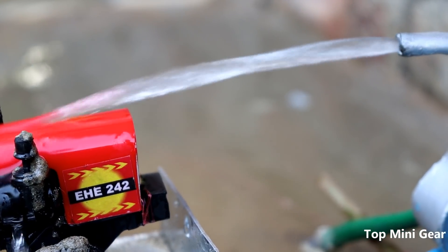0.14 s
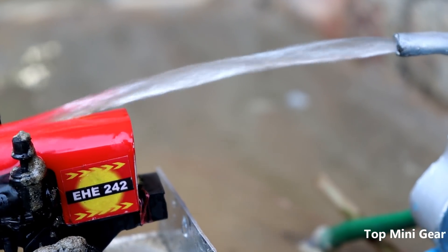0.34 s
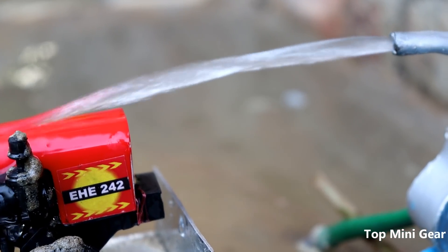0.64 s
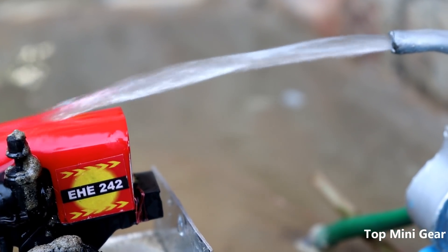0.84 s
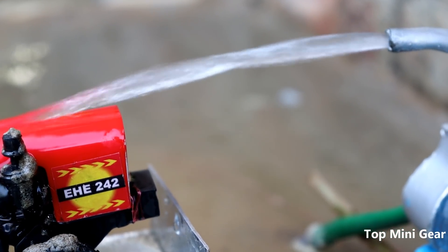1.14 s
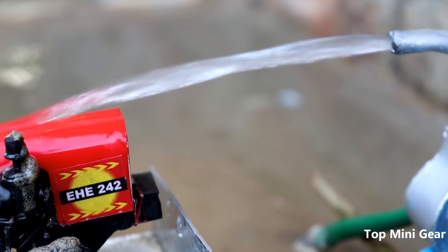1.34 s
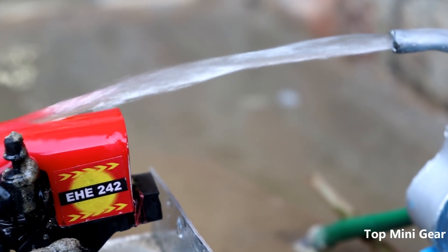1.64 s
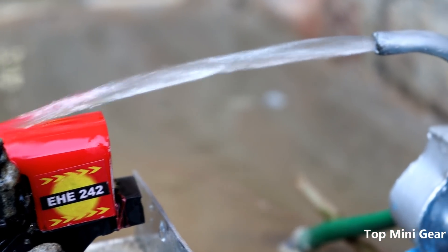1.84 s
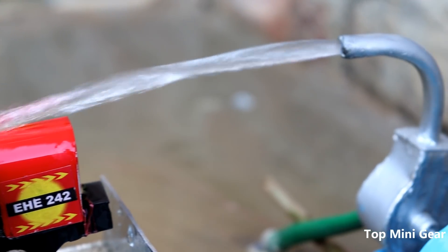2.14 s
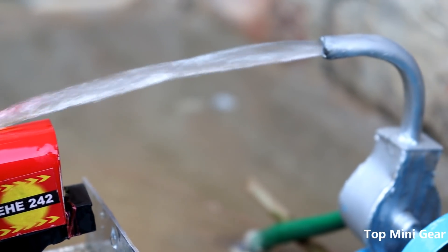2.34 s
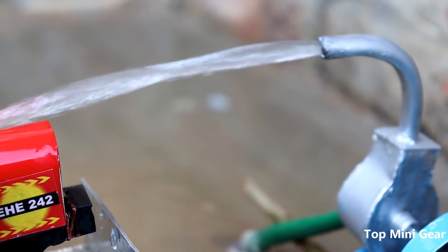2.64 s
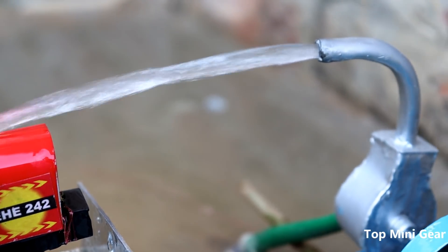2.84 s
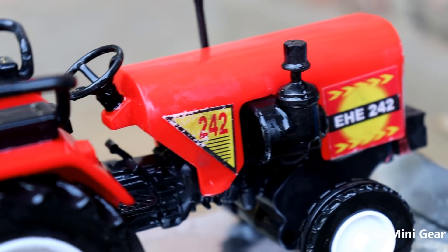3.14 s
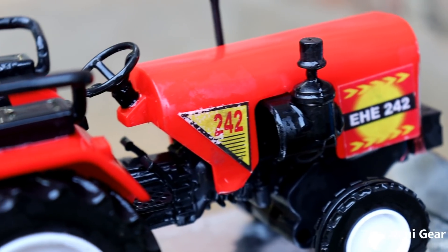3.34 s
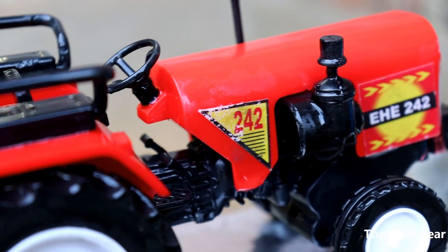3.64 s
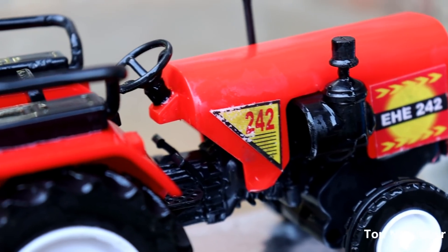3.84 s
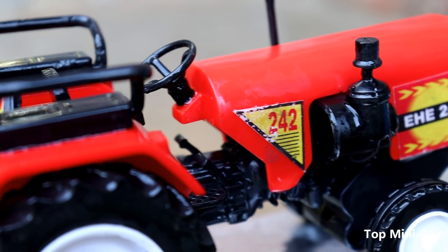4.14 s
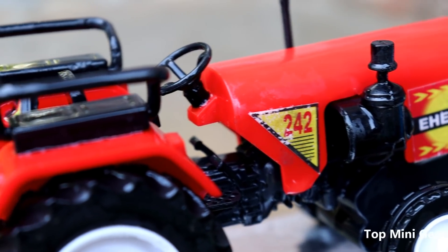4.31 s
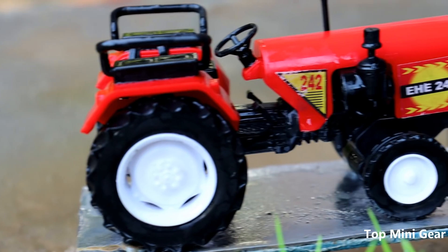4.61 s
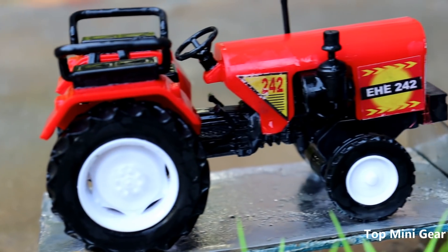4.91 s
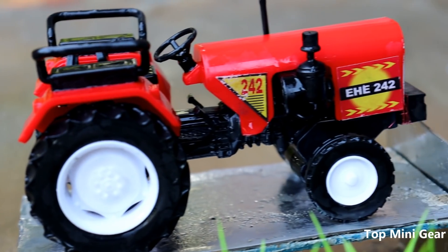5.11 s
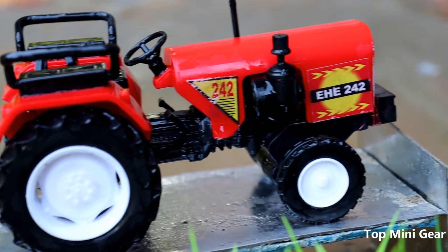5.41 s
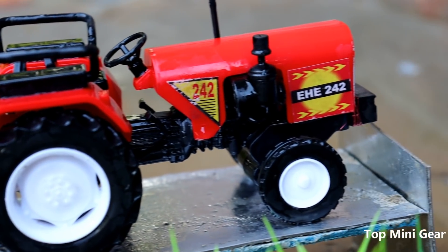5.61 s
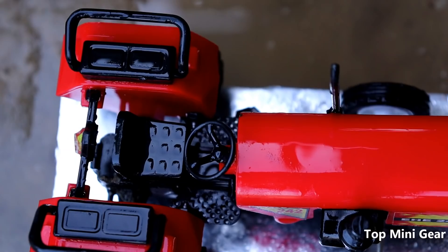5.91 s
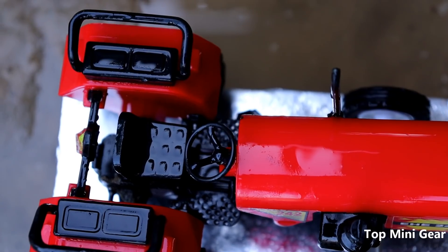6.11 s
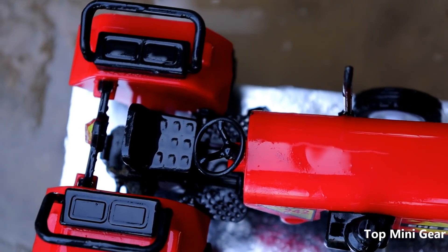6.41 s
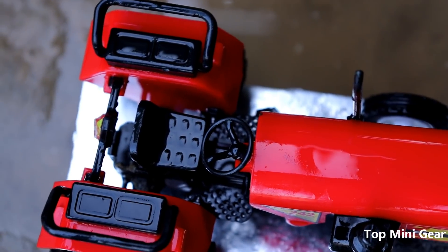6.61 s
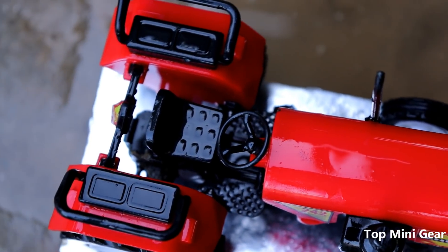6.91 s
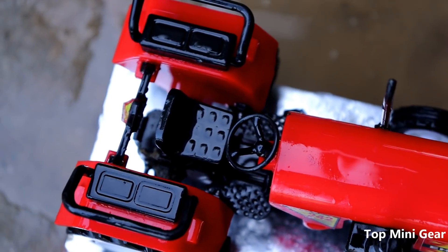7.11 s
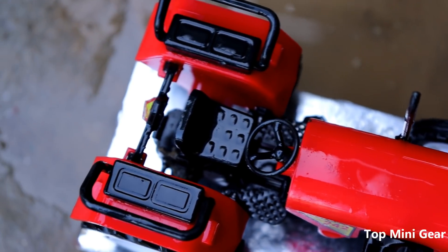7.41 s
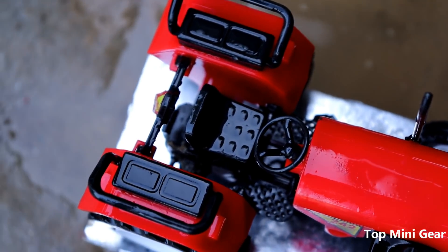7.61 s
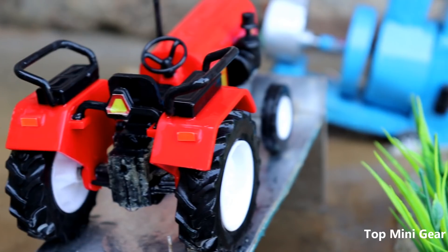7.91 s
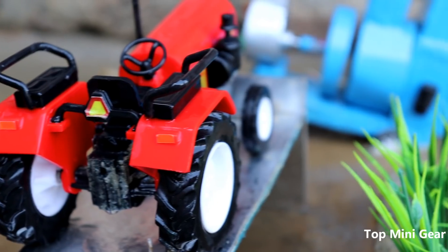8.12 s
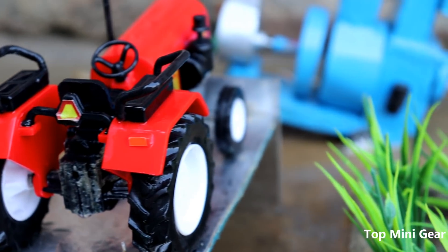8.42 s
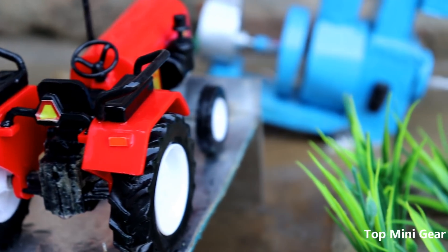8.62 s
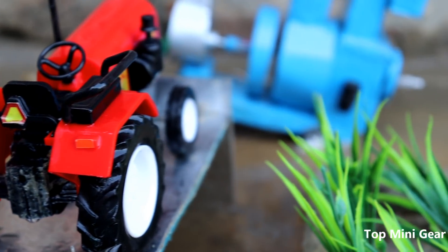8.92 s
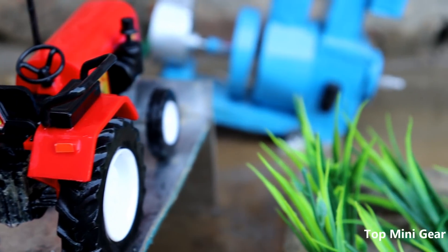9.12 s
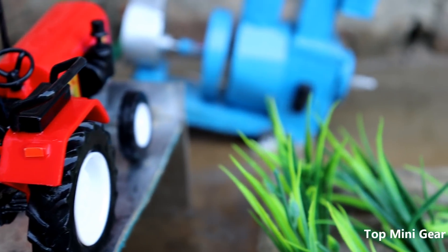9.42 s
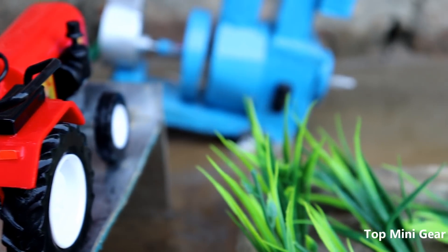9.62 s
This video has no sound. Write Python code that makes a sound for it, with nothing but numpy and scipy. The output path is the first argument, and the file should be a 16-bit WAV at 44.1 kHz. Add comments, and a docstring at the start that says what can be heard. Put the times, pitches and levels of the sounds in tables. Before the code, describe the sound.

Outdoors, loud, rapid chugging and rattling from a small nearby pump mixes with the pulsing hiss and wide spatter of water hitting plastic. A few sharp clacks come just before it all cuts off, three seconds in. Soft chirps, gliding whistles and distant raspy fowl crows fill the rest over a gentle hush of trees, broken once, midway, by a split-second burst of the chug.

```python
"""Chug and water jet among birds

An engine-like chug knocks and rattles about 12 times a second. With each stroke a thin jet spurts and
spatters on a plastic toy. Both stop dead at 3 s; a brief, abruptly cut burst of chug noise comes at 5 s.
Small birds whistle in the trees (gliding sines) and hoarse fowl crow far off (harmonics and rasp
through a throat resonance), over a low rumble and the hush of the trees."""
import sys
import numpy as np
from scipy import signal
from scipy.fft import rfft, irfft, next_fast_len
from scipy.io import wavfile

SR = 44100
rng = np.random.default_rng(int(sys.argv[2]) if len(sys.argv) > 2 else 0)


def unload_audio(sound):
    """Save the sound as a 16-bit wav file, at the path given as the first command line argument."""
    columns = np.transpose(np.atleast_2d(sound))
    # keep every value between -1 and 1, then stretch to whole-number steps
    steps = np.round(np.clip(columns, -1, 1) * 32767)
    wavfile.write(sys.argv[1], SR, steps.astype(np.int16))


N = 429975
TIME = np.arange(N) / SR
STROKE_S, FIRST_STROKE_S, CHUG_OFF_S = .08511, .021, 3.003

# housing modes: t in stroke/s, rise/s, decay/s, f/Hz, level/dB
HOUSING_KNOCKS = [(-.0006, .0034, .002, 352, -5.6), (-.0009, .0025, .0022, 540, -20),
                  (-.0005, .005, .0047, 217, -23), (.0208, .0032, .009, 225, -18.4),
                  (.0209, .002, .0065, 364, -13.3), (.0405, .0018, .004, 725, -17.5),
                  (.0537, .002, .004, 930, -21), (.0578, .0008, .0057, 367, -13.3),
                  (.058, .004, .0135, 96, -25.5)]
# drive rattle: t in stroke/s, rise/s, decay/s, f/Hz, bandwidth/Hz, level/dB
DRIVE_RATTLES = [(0.039, 0.0022, 0.011, 740, 347.5, -24.5), (0.0404, .0025, 0.011, 2530, 600, -19.5),
                 (.042, .003, 0.016, 1600, 994.5, -26), (0.053, .004, 0.017, 890, 401, -28.5),
                 (0.0573, 0.0006, 0.0016, 3613, 3587, -15), (0.059, .002, 0.05, 1510, 903, -24),
                 (.059, .0015, 0.016, 2770, 520, -17), (0.062, .003, 0.015, 4730, 1866, -21),
                 (0.08, .002, 0.0088, 2600, 707, -23.5)]
# rattle gain: t/s, level/dB
RATTLE_GAIN = [(0, 1.5), (1.2, .5), (2, -1.5), (3, -4.5)]
# nozzle spurt: t/s, t in stroke/s, level/dB
SPURT_TRACK = [(0, 0.069, -17), (.7, 0.069, -16.5), (1.45, 0.064, -14), (1.75, 0.063, -12.5),
               (2.4, .063, -12), (2.8, 0.063, -11.5), (3, 0.058, -12)]
# chug and water spectra: f/Hz, level/dB
WHIR_SPECTRUM = [(10, -30.5), (60, -11.5), (150, -3.5), (330, 2.5), (560, 0), (950, -1.5), (1200, -10),
                 (1900, -8), (2600, -4), (3300, -7), (6000, -14.5), (10000, -18.5), (15000, -12.5)]
SPURT_SPECTRUM = [(2000, -27.5), (5000, -4), (7000, -11), (10000, -4.5), (14500, 1), (16000, -5.5)]
SPATTER_SPECTRUM = [(1470, -8.5), (2500, -31.5), (2620, -11.5), (3260, -17.5), (4510, -0.5), (8020, -4.5),
                    (12900, -4), (15000, -10), (16000, -15.5)]
CLACK_SPECTRUM = [(500, -12), (1200, -4), (2700, 2.5), (5000, -1.5), (9000, -12), (16000, -16)]
BURST_SPECTRUM = [(59, -48), (100, -15), (373, 3.5), (524, -16), (970, -3.5), (1360, -11), (1520, -12),
                  (4770, -15), (6990, -28.5), (12400, -20), (16000, -16)]
# background envelopes: t/s, level/dB
BREEZE_ENVELOPE = [(0, -49), (1.8, -50), (2.3, -43), (3, -43)]
RUMBLE_ENVELOPE = [(4.1, -66), (4.6, -56.5), (6, -58.5), (6.3, -65.5), (8.3, -65), (8.9, -59.5), (9.6, -71)]
# background spectra: f/Hz, level/dB
BREEZE_SPECTRUM = [(10, -3), (18, 0), (40, -14), (100, -18), (500, -28), (3000, -50)]
RUMBLE_SPECTRUM = [(20, -8), (50, -3), (95, 1.5), (130, -9), (200, -16.5), (400, -51.5)]
TREE_HUSH_SPECTRUM = [(100, -25.5), (200, -17.5), (280, -11), (400, -22.5), (530, -21), (680, -4.5),
                      (1000, -3.5), (1350, -1), (1750, -7), (2100, -13), (4300, -27), (6500, -24.5),
                      (8000, -29.5), (16000, -32)]
LOW_FLOCK_SPECTRUM = [(1800, -33), (2250, -2.5), (2550, -1), (2800, -6), (3100, -26.5), (4000, -46.5)]
HIGH_FLOCK_SPECTRUM = [(2500, -18.5), (2950, -4), (3450, 3), (3800, -11.5), (4200, -25), (5500, -44)]
# flare-ups of two far flocks: peak t/s, half length/s, level/dB
LOW_FLOCK_FLARES = [(3.97, .16, -52.5), (4.748, .12, -51), (5.15, 0.24, -53), (5.976, .12, -50),
                    (6.502, 0.2, -52), (7, 0.33, -50.5), (8.095, 0.19, -51), (8.8, 0.21, -50),
                    (9.558, 0.15, -49.5)]
HIGH_FLOCK_FLARES = [(3, .12, -53), (3.7, .18, -53), (4.74, 0.15, -50), (5.5, 0.25, -58), (6.87, 0.13, -50),
                     (7.43, 0.16, -53), (8.37, 0.25, -52), (9.1, 0.11, -55), (9.63, 0.13, -54)]
# clacks accenting late strokes: t/s, level/dB
ACCENT_CLACKS = [(2.273, -19.5), (2.357, -13), (2.7, -17), (2.943, -10), (2.977, -13.5)]
# falling bird notes: t/s, length/s, top f/Hz, held f/Hz, level/dB
SLUR_NOTES = [(3.013, 0.089, 4100, 3480, -51.5), (3.32, 0.069, 6860, 4070, -51),
              (3.404, 0.039, 3900, 3260, -44.5), (3.607, 0.047, 5600, 4750, -48),
              (3.675, 0.042, 6870, 5880, -47.5), (3.716, 0.062, 5600, 3500, -53),
              (4.032, .07, 6580, 3970, -52.5), (4.101, 0.033, 3840, 3380, -41),
              (4.23, 0.081, 5700, 4340, -51.5), (4.376, .095, 6700, 3560, -51.5),
              (4.433, 0.082, 6450, 5500, -47), (4.586, 0.034, 5150, 4800, -46),
              (5.419, .095, 7360, 3400, -50.5), (5.768, 0.067, 6500, 4200, -56),
              (6.113, 0.073, 6520, 4950, -51.5), (6.474, 0.093, 7170, 3390, -50.5),
              (9.223, 0.035, 5360, 4760, -50), (9.614, 0.063, 6900, 5960, -57)]
# fluted bird notes: t/s, length/s, start f/Hz, middle f/Hz, end f/Hz, level/dB
WHISTLE_NOTES = [(3.165, 0.089, 5650, 5850, 5300, -59), (3.503, 0.022, 6250, 6100, 6100, -55),
                 (3.532, 0.057, 3250, 4400, 4600, -51), (3.779, .028, 3890, 3160, 2870, -47.5),
                 (3.828, 0.027, 3260, 3620, 3760, -46), (3.925, 0.058, 4860, 5440, 5030, -52.5),
                 (4.204, 0.044, 5660, 5730, 5720, -53), (4.398, 0.046, 2797, 2340, 1810, -46.5),
                 (4.491, 0.16, 1960, 1860, 1710, -44.6), (4.764, .06, 4150, 3760, 3100, -52),
                 (4.757, 0.15, 2466, 2440, 2366, -40), (4.826, 0.059, 3290, 2440, 1730, -40.5),
                 (4.919, 0.074, 2463, 2514, 2350, -37.5), (5.044, 0.083, 4610, 5000, 4720, -53.5),
                 (5.042, 0.076, 2830, 3690, 3300, -51), (5.41, 0.19, 2370, 2177, 1880, -41),
                 (5.57, 0.074, 2006, 2144, 2135, -42.5), (5.773, .19, 2310, 2085, 2015, -39.5),
                 (6.071, 0.15, 1743, 1577, 1550, -42), (6.131, .12, 1301, 1405, 1557, -34.5),
                 (6.428, 0.141, 1580, 1930, 1840, -39), (6.835, 0.043, 2870, 3900, 2800, -54),
                 (7.009, .165, 1202, 1422, 1206, -37), (8.42, .11, 6520, 6610, 6760, -66),
                 (8.541, .034, 2200, 3210, 4270, -43.5), (8.578, 0.053, 4470, 4530, 4500, -59),
                 (8.773, .12, 3720, 3750, 4513, -56), (8.999, .11, 5630, 5670, 5300, -54),
                 (9.287, .04, 5050, 4990, 5030, -51), (9.406, 0.056, 5530, 5700, 4830, -53),
                 (9.719, 0.031, 4440, 5350, 5370, -54)]
# buzzing bird notes: peak t/s, half length/s, f/Hz, level/dB
BUZZ_NOTES = [(3.36, .12, 2520, -50.5), (3.6, 0.023, 5700, -57), (4.728, .022, 5600, -52),
              (5.052, 0.015, 6210, -53), (5.725, 0.046, 2455, -40.5), (5.887, 0.017, 5190, -57),
              (5.893, 0.052, 3460, -54), (6.816, .02, 5220, -56), (7.672, 0.021, 4980, -55),
              (9.159, 0.024, 4900, -55), (9.559, .04, 6350, -62)]
# repeats of one twitter: t/s, level/dB
TWITTER_STARTS = [(3.648, -44.5), (5.897, -44), (7.688, -43), (9.171, -44)]
# its notes: t in twitter/s, length/s, start f/Hz, middle f/Hz, end f/Hz, relative level/dB
TWITTER_PHRASE = [(0, .018, 2920, 3650, 4380, -6), (0.018, 0.0178, 4400, 3760, 3100, -9),
                  (0.035, 0.0503, 3450, 2880, 3150, -0.5), (.085, .028, 3660, 2770, 2430, 0.5)]
# fowl calls: t/s, length/s, climax t in call/s, climax f/Hz, pitch sag/fraction,
# formant scale/ratio, hoarseness/0-1, relative level/dB
FOWL_CROWS = [(3.68, .77, .34, 559.7, .12, 1.003, .9, -30.5),
              (4.69, 0.63, .22, 645.4, .19, 1.008, 0.89, -27.5),
              (7.818, 0.41, 0.18, 652, 0.065, 1.13, 0.92, -38),
              (8.472, 0.36, 0.132, 536, 0.0312, 1.09, 0.82, -37.5),
              (8.79, 0.96, .47, 628, .17, 0.99, 0.61, -30)]
# fowl throat response and rasp: f/Hz, level/dB
THROAT_SPECTRUM = [(400, -45), (600, -26.5), (830, -36), (1020, 0.5), (1280, 4), (1550, 3.5), (1850, -10.5),
                   (2150, -21), (3200, -41), (5000, -57)]
RASP_SPECTRUM = [(450, -40), (620, -21), (850, -17), (1050, -5), (1300, 0.5), (1550, 0.5), (1800, -5.5),
                 (2050, -22.5), (3200, -45), (5000, -65)]


def from_db(db):
    """Decibels to gain."""
    return 10 ** (np.asarray(db) / 20)


def unit_rms(x):
    """Scale to rms 1."""
    return x / np.sqrt(np.mean(x ** 2) + 1e-20)


def curves(rows):
    """Per-sample curve of each column after t."""
    t_s, *columns = np.transpose(rows)
    return [np.interp(TIME, t_s, column) for column in columns]


def colour(x, spectrum, stretch=1):
    """Filter by a spectrum, its frequencies times stretch; rms 1."""
    length = x.shape[-1]
    size = next_fast_len(length)
    hz, db = np.transpose(spectrum)
    bins_hz = np.maximum(np.fft.rfftfreq(size, 1 / SR), 1)
    gain = from_db(np.interp(np.log(bins_hz), np.log(hz * stretch), db))
    return unit_rms(irfft(rfft(x, size) * gain, size)[..., :length])


def noise(spectrum):
    """Coloured noise; rms 1."""
    return colour(rng.standard_normal(N), spectrum)


def drift(rate_hz):
    """Interpolated random values; spread about 1."""
    knots = rng.standard_normal(N // 10)
    return np.interp(TIME * rate_hz, np.arange(len(knots)), knots)


def swell(age_s, rise_s, decay_s):
    """Gaussian rise to age 0, then exponential decay."""
    return np.exp(-np.where(age_s < 0, (age_s / rise_s) ** 2, age_s / decay_s).clip(0, 60))


def hump(t_s, half_s):
    """Gaussian envelope around t_s."""
    return np.exp(-np.minimum(((TIME - t_s) / half_s) ** 2, 60))


def ages(length_s):
    """Time axis of one note."""
    return np.arange(int(length_s * SR)) / SR


def add(out, t_s, sound):
    """Mix a sound in at t_s."""
    part = out[int(t_s * SR):][:len(sound)]
    part += sound[:len(part)]


def stroke_age(offset_s):
    """Signed time from the nearest pass of this point in the stroke."""
    return (TIME - FIRST_STROKE_S - offset_s + STROKE_S / 2) % STROKE_S - STROKE_S / 2


def chug(whir_db=-22.5, knock_spread_db=1.55, rattle_spread_db=1.6, grit_db=3.5):
    """Engine-like strokes: ringing knocks and band-passed rattles over a whir."""
    out = from_db(whir_db + 2.6 * drift(150)) * noise(WHIR_SPECTRUM)
    for offset_s, rise_s, decay_s, hz, db in HOUSING_KNOCKS:
        age_s = stroke_age(offset_s) + .00008 * drift(12)
        gain = from_db(db + knock_spread_db * drift(12))
        out += gain * swell(age_s, rise_s, decay_s) * np.cos(2 * np.pi * hz * age_s)
    rattle_db, = curves(RATTLE_GAIN)
    for offset_s, rise_s, decay_s, hz, width_hz, db in DRIVE_RATTLES:
        band_hz = [max(hz - width_hz / 2, 50), hz + width_hz / 2]
        body = signal.butter(2, band_hz, "band", fs=SR, output="sos")
        contacts = rng.standard_normal(N) * from_db(grit_db * drift(600))   # loose parts touch unevenly
        ringing = unit_rms(signal.sosfilt(body, contacts))
        gain = from_db(db + rattle_db + rattle_spread_db * drift(24.98))
        out += gain * swell(stroke_age(offset_s), rise_s, decay_s) * ringing
    return out


def jet(spatter_db=-28, drops_per_s=9000, drop_spread_db=4.5, clump_db=6.5, surge_db=2.2):
    """The nozzle hisses once a stroke; drops burst on the toy, left and right."""
    offset_s, spurt_db = curves(SPURT_TRACK)
    pulses = swell(stroke_age(offset_s), rise_s=.0036, decay_s=.0062)
    spurt = from_db(spurt_db + 1.16 * drift(9.2)) * pulses * noise(SPURT_SPECTRUM)
    sizes = from_db(drop_spread_db * np.minimum(rng.exponential(1, (2, N)), 5))
    signs = rng.choice([-1, 1], (2, N))
    drops = sizes * signs * (rng.random((2, N)) < drops_per_s / SR)
    clumps = from_db(clump_db * np.array([drift(110), drift(110)]))
    surges = from_db(surge_db * drift(7))
    return spurt + from_db(spatter_db) * colour(drops * clumps * surges, SPATTER_SPECTRUM)


def breeze(gust_db=2):
    """Air stirs at each microphone port separately."""
    level_db, = curves(BREEZE_ENVELOPE)
    return from_db(level_db + gust_db * drift(3)) * np.array([noise(BREEZE_SPECTRUM) for side in "LR"])


def surroundings(hush_db=-50.5):
    """Low rumble and the hush of the trees."""
    rumble_db, = curves(RUMBLE_ENVELOPE)
    return from_db(rumble_db) * noise(RUMBLE_SPECTRUM) + from_db(hush_db) * noise(TREE_HUSH_SPECTRUM)


def far_flock(flares, spectrum, murmur_db, chatter_db=3):
    """Far birds blur into a noise band that flares now and then."""
    flaring = sum(from_db(db) * hump(t_s, half_s) for t_s, half_s, db in flares)
    return np.hypot(from_db(murmur_db), flaring) * from_db(chatter_db * drift(25)) * noise(spectrum)


def clacks(rise_s=.00077, decay_s=.0039):
    """Sharp, bright clacks that accent a few of the last strokes."""
    envelope = sum(from_db(db) * swell(TIME - t_s, rise_s, decay_s) for t_s, db in ACCENT_CLACKS)
    return envelope * noise(CLACK_SPECTRUM)


def slur(t_s, length_s, top_hz, held_hz, db, fall_share=.25, roughness=.035, fade_db=6.5):
    """Note (t, f curve, level curve) that drops roughly onto a held tone and fades."""
    along = ages(length_s) / length_s
    falling = np.exp(-(along / fall_share) ** 1.6)
    shake = 1 + roughness * np.sqrt(falling) * drift(910)[:len(along)]
    return t_s, (held_hz + (top_hz - held_hz) * falling) * shake, db - fade_db * along


def whistle(t_s, length_s, start_hz, middle_hz, end_hz, db, boost_db=2, sag_db=7.5):
    """Note that bends through three pitches, loudest in the middle."""
    along = ages(length_s) / length_s
    bend = np.polyfit([0, .5, 1], [start_hz, middle_hz, end_hz], 2)
    return t_s, np.polyval(bend, along), db + boost_db - sag_db * (2 * along - 1) ** 2


def buzzes(jitter=.098):
    """Bird tones whose pitch shakes too fast to follow."""
    shaken_s = np.cumsum(1 + jitter * drift(900)) / SR
    return sum(np.sqrt(2) * from_db(db) * hump(t_s, half_s) * np.sin(2 * np.pi * hz * shaken_s)
               for t_s, half_s, hz, db in BUZZ_NOTES)


def twitters():
    """One bird repeats a zigzag and two tumbling notes."""
    return [whistle(t_s + after_s, *shape, db + note_db)
            for t_s, db in TWITTER_STARTS for after_s, *shape, note_db in TWITTER_PHRASE]


def warble(t_s=4.608, pips=4, pip_s=.036, arch_hz=(2950, 3940, 3050), db=-49):
    """A row of arched pips."""
    return [whistle(t_s + k * pip_s, pip_s, *arch_hz, db) for k in range(pips)]


def sweep(t_s=6.882, length_s=.489, glide_s=.05, low_hz=2220, high_hz=3950, low_db=-36, high_db=-52):
    """Long note, up to a plateau and back; softer when higher."""
    age_s = ages(length_s)
    height = 1 - np.exp(-age_s / glide_s) - np.exp(-age_s[::-1] / glide_s)
    return t_s, low_hz + height * (high_hz - low_hz), low_db + height ** 3 * (high_db - low_db)


def woodland(x, wet_db, t60_s=.77, build_s=.0026):
    """Trunks and leaves scatter a sound into a diffuse tail."""
    age_s = TIME[:SR]
    tail = rng.standard_normal(SR) * from_db(-60 * age_s / t60_s) * (1 - np.exp(-age_s / build_s))
    return x + from_db(wet_db) * signal.fftconvolve(x, tail / np.linalg.norm(tail))[:N]


def songbirds(waver=.011, flutter_db=2.5):
    """Near-pure wavering notes and short buzzes among the trees."""
    wobble = 1 + waver * drift(250)
    flutter = from_db(flutter_db * drift(120))
    notes = [whistle(*row) for row in WHISTLE_NOTES] + [slur(*row) for row in SLUR_NOTES]
    out = buzzes()
    for t_s, hz, db in notes + twitters() + warble() + [sweep()]:
        n = len(hz)
        pitch_hz = hz * wobble.take(int(t_s * SR) + np.arange(n), mode="clip")
        fade = signal.windows.tukey(n, min(.3, .04 * SR / n))
        add(out, t_s, np.sqrt(2) * from_db(db) * fade * np.sin(2 * np.pi * np.cumsum(pitch_hz) / SR))
    return woodland(out * flutter, wet_db=-5.5)


def far_fowl(gain_db=-6.5, halves_db=-2.5, rasp_db=-3, tremble_db=3, sag_db=7,
             jitter=.03, wander=.014, attack_s=.029, release_s=.08):
    """Pitch and level arch with effort; hoarseness adds jitter, half-harmonics and rasp."""
    out = np.zeros(N)
    for t_s, length_s, climax_s, top_hz, sag, stretch, hoarse, db in FOWL_CROWS:
        age_s = ages(length_s)
        n = len(age_s)
        slack = np.interp(age_s, [0, climax_s, length_s], [1, 0, 1]) ** 2
        shake = 1 + jitter * hoarse * drift(140)[:n] + wander * drift(14)[:n]
        pitch_hz = top_hz * (1 - sag * slack) * shake
        phase = 2 * np.pi * np.cumsum(pitch_hz) / SR
        harmonics = sum(np.sin(k * phase) for k in range(1, 6))
        halves = sum(np.sin((k + .5) * phase) for k in range(1, 5))
        rasp = colour(rng.standard_normal(n) * (1 + .5 * np.cos(phase)), RASP_SPECTRUM, stretch)
        voice = colour(harmonics + from_db(halves_db) * hoarse * halves, THROAT_SPECTRUM, stretch)
        voice += from_db(rasp_db) * hoarse * rasp
        gate = np.minimum(1, np.minimum(age_s / attack_s, age_s[::-1] / release_s))
        add(out, t_s, from_db(db - sag_db * slack + tremble_db * drift(30.3)[:n]) * gate * voice)
    return from_db(gain_db) * woodland(out, wet_db=1)


def chug_burst(t_s=4.998, end_s=5.0225, noise_db=-17.5,
               knock_hz=680, knock_db=-12.5, thud_hz=310, thud_db=-17.5):
    """Brief, abruptly cut burst of chugging noise, ending on a knock."""
    burst = from_db(noise_db) * swell(TIME - t_s, rise_s=.0055, decay_s=.08) * noise(BURST_SPECTRUM)
    age_s = TIME - end_s + .0022
    modes = sum(from_db(db) * np.cos(2 * np.pi * hz * age_s)
                for hz, db in [(knock_hz, knock_db), (thud_hz, thud_db)])
    knock = swell(age_s, rise_s=.0037, decay_s=.004) * modes
    return (burst + knock) * np.clip((end_s - TIME) / .00056, 0, 1)


def scene():
    """Chug and birds centred; spatter and breeze wide, both stopping with the chug."""
    running = np.clip((CHUG_OFF_S - TIME) / .001, 0, 1)
    out = running * (chug() + clacks() + jet() + breeze())
    out += chug_burst() + songbirds() + far_fowl() + surroundings()
    out += far_flock(LOW_FLOCK_FLARES, LOW_FLOCK_SPECTRUM, murmur_db=-58)
    out += far_flock(HIGH_FLOCK_FLARES, HIGH_FLOCK_SPECTRUM, murmur_db=-63)
    return out


def record(dry, ceiling=.95, cutoff_hz=15900):
    """Soft clip, then steep low-pass."""
    rounded = dry / (1 + (dry / ceiling) ** 8) ** (1 / 8)
    return signal.sosfilt(signal.ellip(10, .2, 80, cutoff_hz, fs=SR, output="sos"), rounded)


dry = scene()
out = record(dry)
unload_audio(out)
```